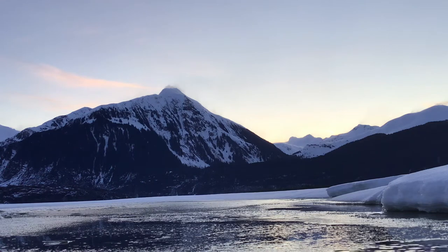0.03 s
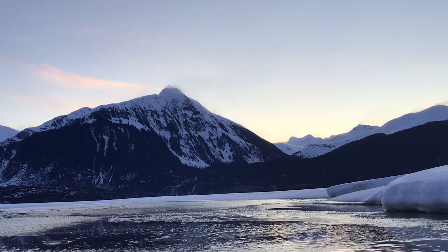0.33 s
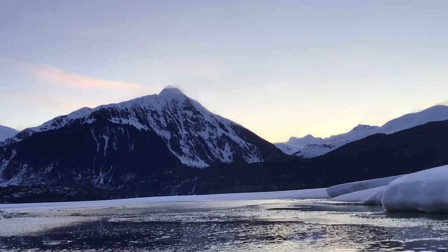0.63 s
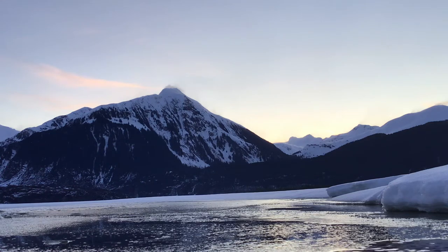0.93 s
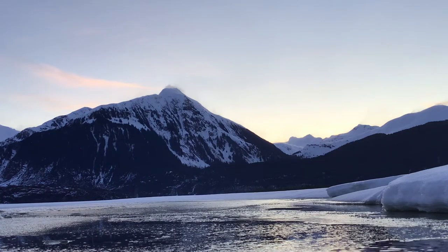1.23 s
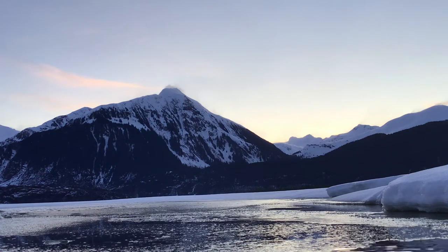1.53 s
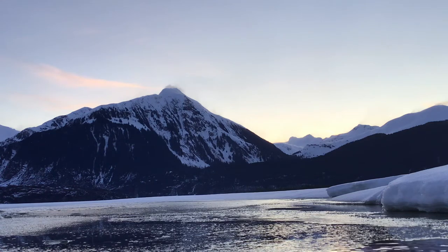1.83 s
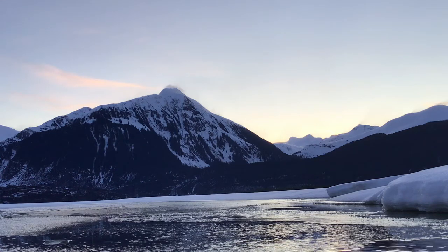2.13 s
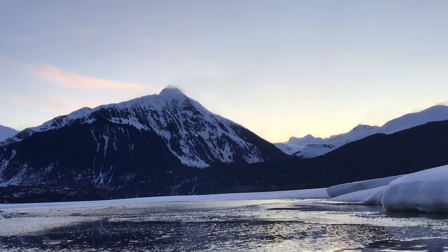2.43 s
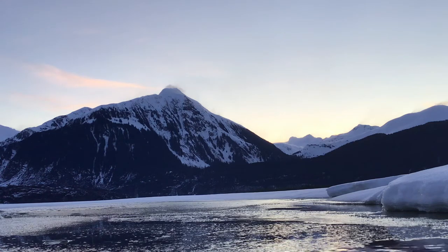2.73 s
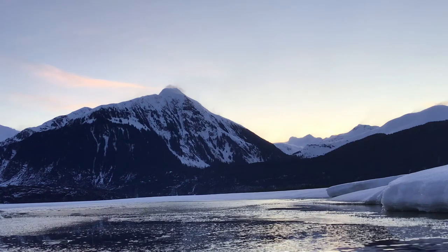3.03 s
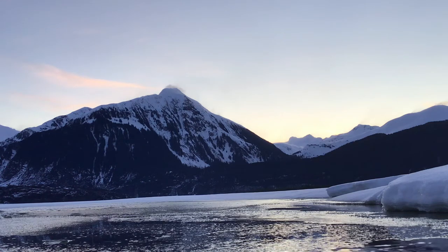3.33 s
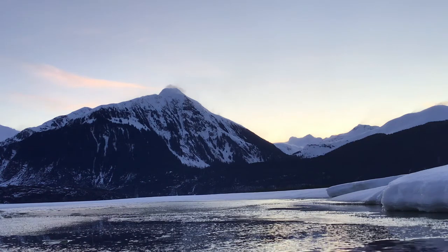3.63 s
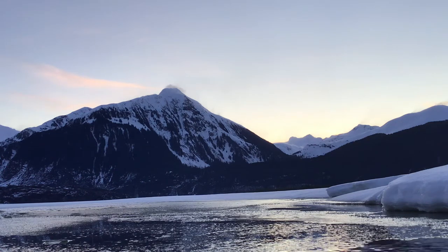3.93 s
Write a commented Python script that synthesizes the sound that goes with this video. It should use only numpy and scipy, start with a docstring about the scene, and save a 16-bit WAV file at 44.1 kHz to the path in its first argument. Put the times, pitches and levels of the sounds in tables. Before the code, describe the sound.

Faint, irregular crackling of thin lake ice, with low wind buffets on the microphone.

```python
"""Thin ice thawing on a still lake

Small fractures in the ice radiate dry ticks everywhere; now and then a crack sets a floe ringing.
Eddies of wind buffet the microphone with low thumps, hardest in the first second and twice more later.
Under it lie a faint distant rumble and an even hiss."""
import sys
import numpy as np
from scipy import signal
from scipy.fft import rfft, irfft
from scipy.io import wavfile

SR = 44100
rng = np.random.default_rng(int(sys.argv[2]) if len(sys.argv) > 2 else 0)


def transcribe(signal):
    """Save signal, clipped to [-1, 1], as a 16-bit WAV file at the path in sys.argv[1]."""
    frames = np.atleast_2d(signal).T
    limited = np.clip(frames, -1, 1)
    pcm = np.round(limited * 32767).astype(np.int16)
    wavfile.write(sys.argv[1], SR, pcm)


N = 176400
TICK_DECAY_S, TICK_Q = .0006, 1.15


def from_db(db):
    """Amplitude grows tenfold for every 20 dB."""
    return 10 ** (np.asarray(db) / 20)


def rms_one(x):
    """Normalisation to unit RMS amplitude."""
    return x / np.sqrt(np.mean(x ** 2) + 1e-20)


def add(out, time_s, sound):
    """Superposition: a sound adds to the mix from time_s on."""
    start = int(round(time_s * SR))
    first, end = max(start, 0), min(start + len(sound), N)
    if end > first:
        out[first:end] += sound[first - start:end - start]


def rumble_and_hiss():
    """Stationary noise: a fixed spectral envelope colours white noise into distant rumble and hiss."""
    # Spectrum of the background (frequency [Hz], relative spectral density [dB])
    spectrum = [(25, -40.5), (50, -18.5), (110, -3.5), (240, -0.5), (450, -8), (750, -12.5), (1300, -15.5),
                (2500, -18.5), (6000, -21), (8800, -22.5), (10000, -27), (15500, -23.5)]
    hz, db = np.transpose(spectrum)
    bin_hz = np.fft.rfftfreq(N, 1 / SR)
    gain = from_db(np.interp(np.log(bin_hz + 1), np.log(hz), db))
    noise = irfft(rfft(rng.standard_normal(N)) * gain, N)
    return from_db(-69) * rms_one(noise)


def fracture(decay_s, hz, q):
    """Damped resonance: a brief burst and its scattering off the ice excite a snap of peak near 1."""
    t = np.arange(SR // 20) / SR
    scattered = from_db(-13.5) * np.exp(-t / .0076)
    burst = rng.standard_normal(len(t)) * (np.exp(-t / decay_s) + scattered)
    omega = 2 * np.pi * hz / SR
    damping = np.sin(omega) / (2 * q)
    snap = signal.lfilter([damping, 0, -damping], [1 + damping, -2 * np.cos(omega), 1 - damping], burst)
    onset_rms = np.sqrt(np.sum(snap ** 2) / (.5 * decay_s * SR))
    return .5 * snap / onset_rms


def far_ice():
    """A Poisson process: independent fractures all over the lake merge into a faint crackle."""
    ticks_per_s, spread_db = 230, 4.5
    pitches_hz = np.geomspace(2284, 9000, num=16)
    out = np.zeros(N)
    for hz in pitches_hz:
        onsets = rng.random(N) < ticks_per_s / len(pitches_hz) / SR
        sizes = from_db(spread_db * np.minimum(rng.exponential(1, N), 3.5))
        out += signal.oaconvolve(onsets * sizes, fracture(TICK_DECAY_S, hz, TICK_Q))[:N]
    return from_db(-76.5) * rms_one(out)


def wind_filter(pressure, cutoff_hz=140):
    """High-pass filtering at the microphone turns a slow push into a short thump."""
    return signal.sosfilt(signal.butter(4, cutoff_hz, "high", fs=SR, output="sos"), pressure)


def turbulence(size, bandwidth_hz):
    """Turbulent pressure: random fluctuation with a Gaussian roll-off, heard through the wind filter."""
    rolloff = np.exp(-.5 * (np.fft.rfftfreq(size, 1 / SR) / bandwidth_hz) ** 2)
    pressure = irfft(rfft(rng.standard_normal(size)) * rolloff, size)
    return rms_one(wind_filter(pressure))


def wind():
    """Each eddy on the microphone is a pressure pulse wrapped in turbulence; weak flutter lies between."""
    # Envelope of the flutter (time [s], level [dB])
    breeze = [(0, -42), (.12, -35.5), (0.191, -51), (.36, -45), (.62, -53), (.88, -56), (1.0, -72),
              (1.25, -64), (1.6, -76), (2.15, -67.5), (2.25, -56.5), (2.5, -73.5), (2.901, -79.5),
              (2.98, -54), (3.17, -59), (3.3, -75), (3.5, -84), (4, -86)]
    # Eddies striking the microphone (time [s], peak level [dB], bandwidth [Hz])
    eddies = [(.004, -33.5, 173), (.016, -39, 171), (0.033, -37, 220), (.049, -13, 219),
              (0.063, -17.5, 192), (.074, -13, 235), (0.084, -15.5, 296), (.098, -17.5, 322),
              (.109, -17, 434), (.116, -19, 222), (.135, -13, 259), (0.167, -31, 150), (.212, -29, 245),
              (.224, -26.5, 186), (.249, -34, 186), (0.273, -42, 150), (0.29, -41, 150), (.308, -29, 175),
              (0.328, -28.5, 287), (.339, -19, 199), (.353, -30.5, 160), (.376, -26.5, 183),
              (0.399, -24.5, 198), (.449, -53, 160), (.474, -36, 165), (.507, -36, 177), (0.521, -33, 155),
              (0.537, -35.5, 163), (0.568, -30.5, 207), (.577, -27.5, 162), (0.641, -41, 140),
              (0.659, -46, 150), (.729, -34.5, 128), (0.747, -38, 155), (.792, -36, 160), (.849, -35, 158),
              (0.861, -46, 160), (.873, -43, 139), (1.211, -57, 160), (1.284, -58, 150),
              (1.464, -50.5, 135), (1.858, -54.5, 151), (2.191, -34, 180), (2.202, -44, 180),
              (2.219, -41, 143), (2.231, -41, 132), (2.299, -51.5, 140), (2.371, -38.5, 180),
              (2.403, -49, 168), (2.947, -40, 205), (2.965, -37.5, 194), (2.975, -37, 185),
              (3.003, -37.5, 200), (3.062, -47, 140), (3.117, -40.5, 200), (3.129, -44, 177),
              (3.149, -40, 142), (3.172, -53, 160)]
    flutter_db = np.interp(np.arange(N) / SR, *np.transpose(breeze))
    out = from_db(flutter_db) * turbulence(N, bandwidth_hz=133)
    t = np.arange(-2048, 2048) / SR
    wake_envelope = from_db(-13) * np.exp(-.5 * (t / .0071) ** 2)
    for time_s, db, hz in eddies:
        thump = wind_filter(np.exp(-.5 * (2 * np.pi * hz * t) ** 2))
        thump /= np.abs(thump).max()
        wake = wake_envelope * turbulence(len(t), hz)
        add(out, time_s + t[0], from_db(db) * (thump + wake))
    return out


def near_ice():
    """Impulse excitation: a crack sets a floe into damped free vibration; a tick is a bare snap."""
    # Cracks that ring a floe
    # (time [s], snap level [dB], snap frequency [Hz], ring level [dB], ring frequency [Hz])
    cracks = [(.2678, -51.5, 5000, -59, 1200), (0.3093, -40, 4000, -56, 1410),
              (.679, -55, 3500, -58.5, 1210), (1.3426, -48, 4000, -53.5, 720),
              (1.358, -51.5, 4940, -58, 770), (1.5564, -51.5, 2560, -57.5, 860),
              (1.975, -61, 5000, -58, 740), (1.9945, -55, 5000, -55.5, 704),
              (2.2705, -46.5, 4000, -54.5, 740), (2.2977, -52, 5000, -57.5, 880),
              (2.5220, -49.5, 3470, -56, 760), (2.5505, -45, 3000, -49.5, 750),
              (2.7451, -37.5, 3300, -54.5, 780), (2.7655, -45, 2510, -53, 743),
              (3.0968, -42.5, 3050, -53.5, 1160), (3.128, -60, 2100, -60, 1900),
              (3.4787, -45, 2200, -49.5, 1175), (3.5298, -37, 2070, -46.5, 1200),
              (3.5474, -42, 2410, -47, 1030), (3.573, -49.5, 2400, -62, 1107),
              (3.701, -50, 2200, -66.5, 1300), (3.802, -46.5, 5000, -58.5, 1030)]
    # Small dry fractures (time [s], level [dB], centre frequency [Hz])
    ticks = [(.0170, -36, 6460), (0.049, -57, 5460), (0.064, -52, 8070), (0.0684, -42.5, 4140),
             (0.166, -48, 3560), (0.283, -44, 5500), (0.7007, -50, 4450), (0.8382, -43.5, 6500),
             (1.2329, -46.5, 4470), (1.2755, -49, 5000), (1.3845, -48.5, 9000), (1.4044, -46, 5430),
             (1.438, -50.5, 7960), (1.6030, -44, 3490), (1.6463, -48.5, 5000), (1.7863, -44, 4050),
             (1.9225, -48, 5000), (2.0850, -52, 3020), (2.184, -46.5, 4440), (2.2903, -48, 8000),
             (2.3876, -46, 6500), (2.4760, -50, 10000), (2.576, -47.5, 6000), (2.6426, -44, 6000),
             (2.6654, -50.5, 9900), (2.7427, -38.5, 4500), (2.755, -50, 9940), (2.7692, -45.5, 3800),
             (3.2010, -41.5, 2620), (3.2200, -50, 5000), (3.3250, -44.5, 4540), (3.8055, -44, 6980)]
    ring_t60_s = .025
    out = np.zeros(N)
    t = np.arange(SR // 20) / SR
    for time_s, snap_db, snap_hz, ring_db, ring_hz in cracks:
        snap = from_db(snap_db) * fracture(decay_s=.0016, hz=snap_hz, q=1.0)
        ring = from_db(ring_db - 60 * t / ring_t60_s) * np.sin(2 * np.pi * ring_hz * t)
        add(out, time_s, snap + ring)
    for time_s, db, hz in ticks:
        add(out, time_s, from_db(db) * fracture(TICK_DECAY_S, hz, TICK_Q))
    return out


def scene():
    """The pressures of wind, ice and background add linearly at one microphone."""
    return (wind() + near_ice() + far_ice() + rumble_and_hiss())[None]


def record(dry):
    """Band limiting: a steep low-pass filter removes the highest treble."""
    cutoff_hz = 15900
    return signal.sosfilt(signal.ellip(10, .1, 70, cutoff_hz, fs=SR, output="sos"), dry)


dry = scene()
out = record(dry)
transcribe(out)
```